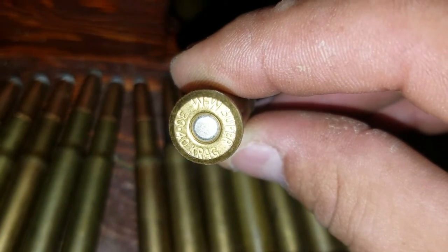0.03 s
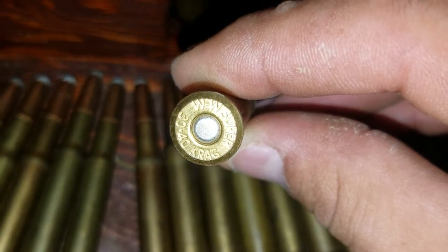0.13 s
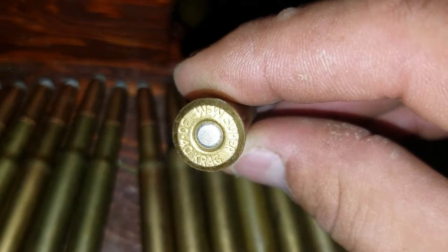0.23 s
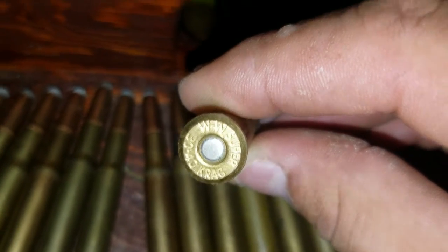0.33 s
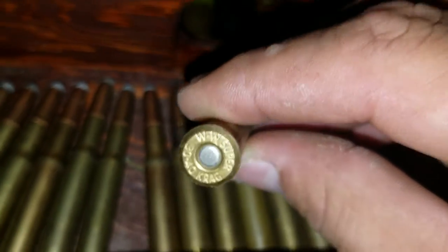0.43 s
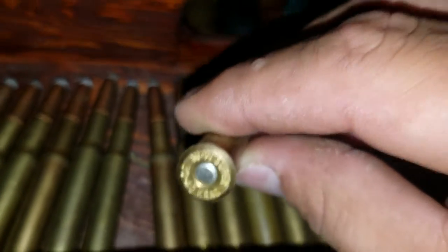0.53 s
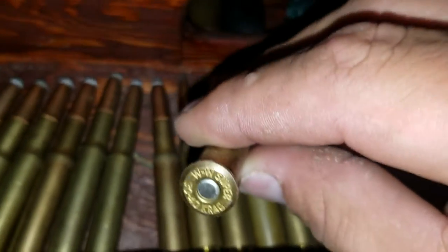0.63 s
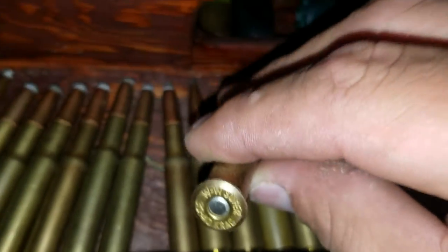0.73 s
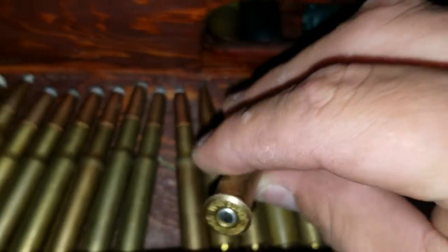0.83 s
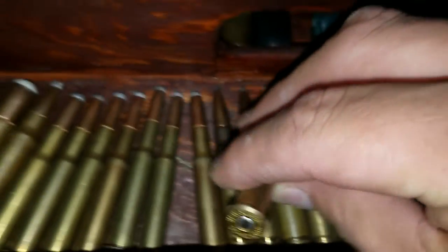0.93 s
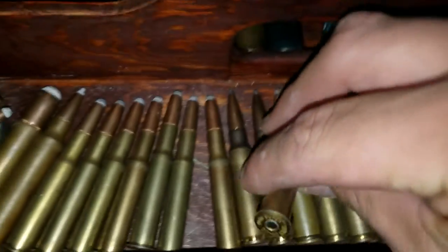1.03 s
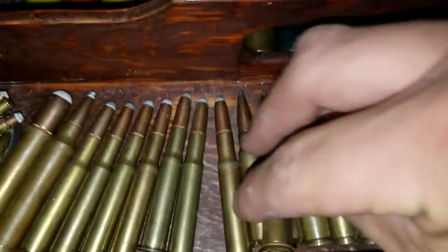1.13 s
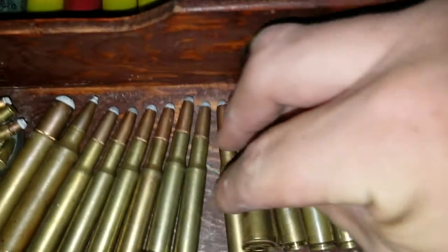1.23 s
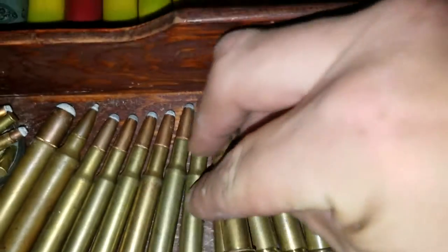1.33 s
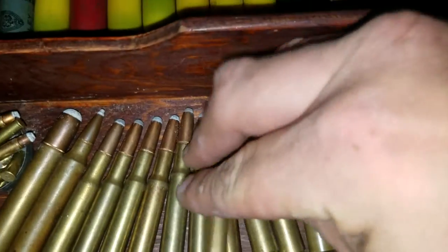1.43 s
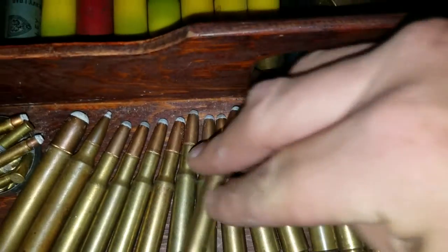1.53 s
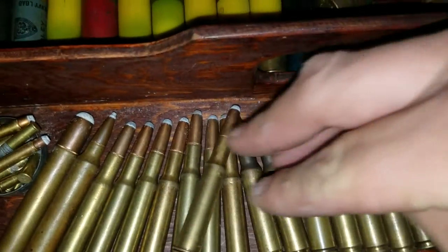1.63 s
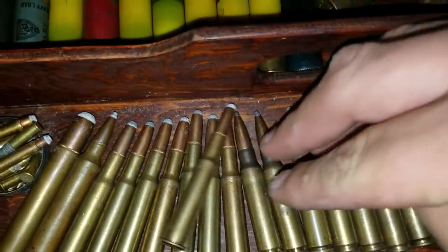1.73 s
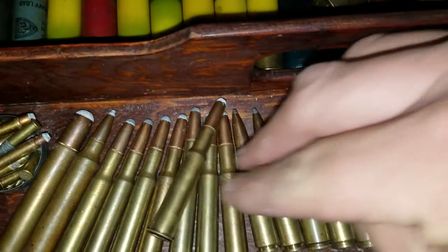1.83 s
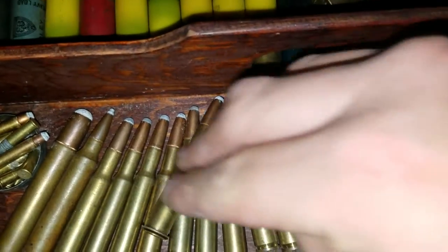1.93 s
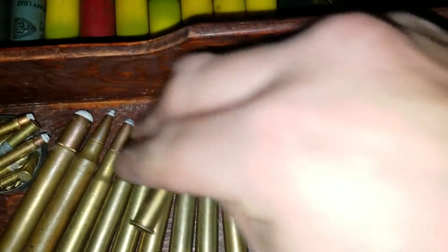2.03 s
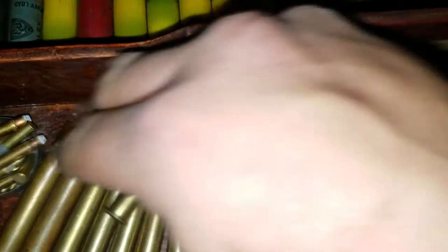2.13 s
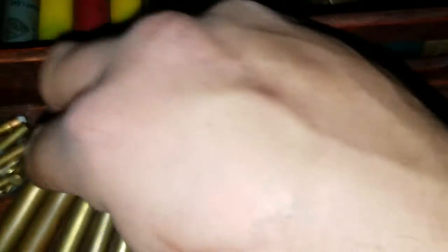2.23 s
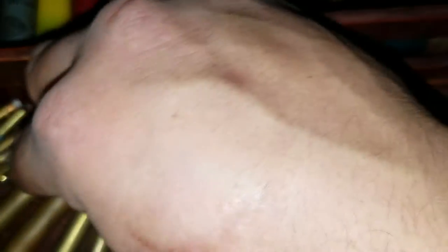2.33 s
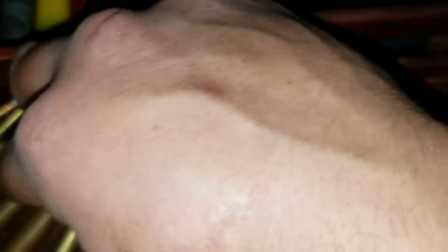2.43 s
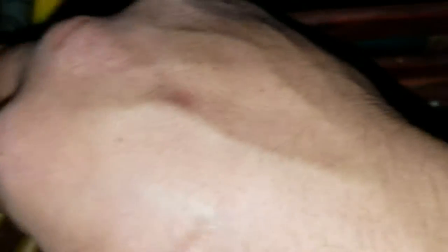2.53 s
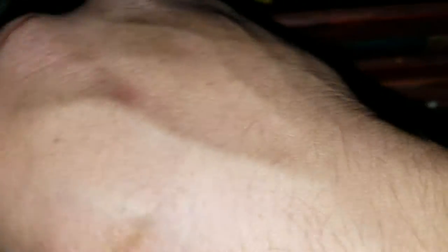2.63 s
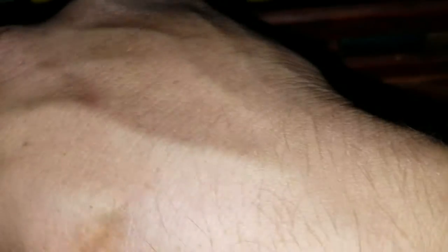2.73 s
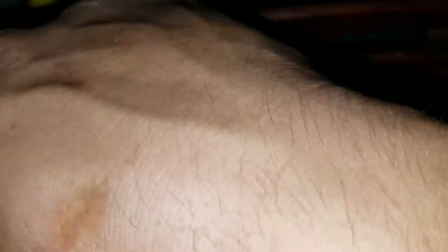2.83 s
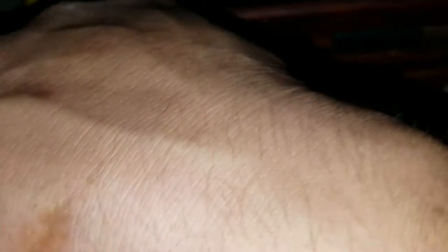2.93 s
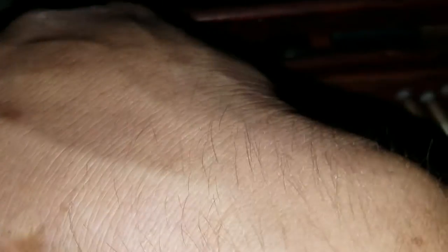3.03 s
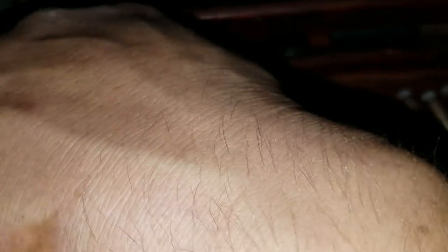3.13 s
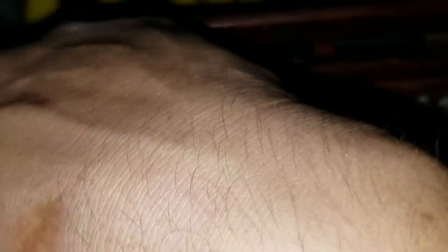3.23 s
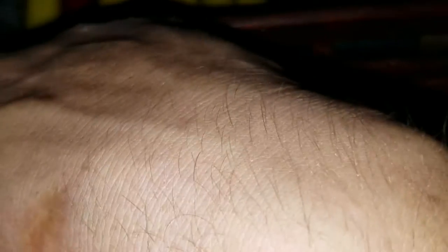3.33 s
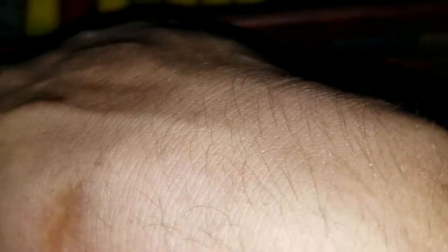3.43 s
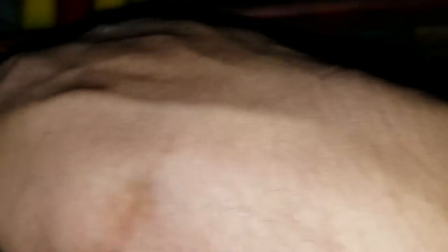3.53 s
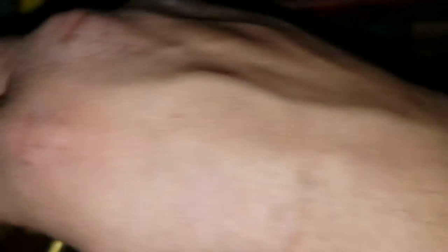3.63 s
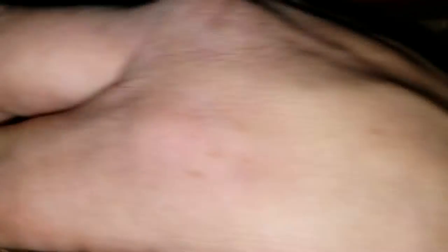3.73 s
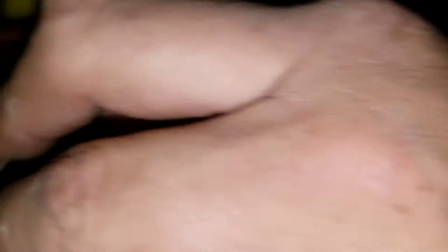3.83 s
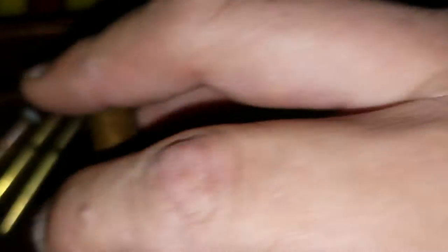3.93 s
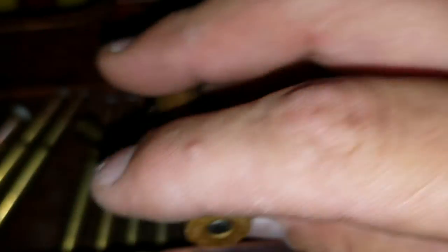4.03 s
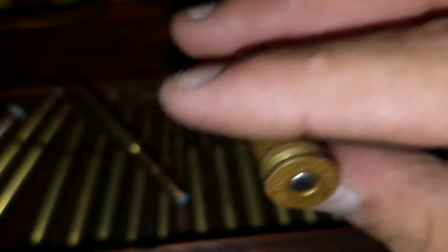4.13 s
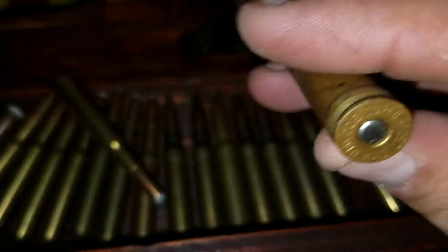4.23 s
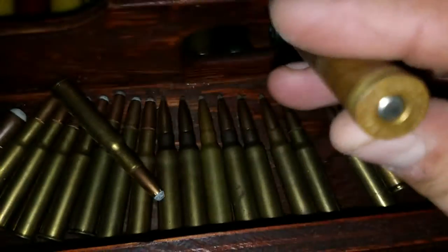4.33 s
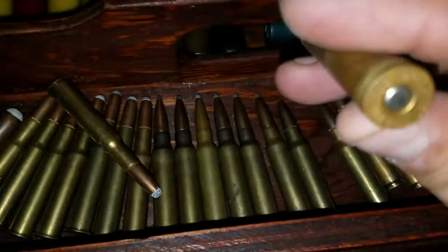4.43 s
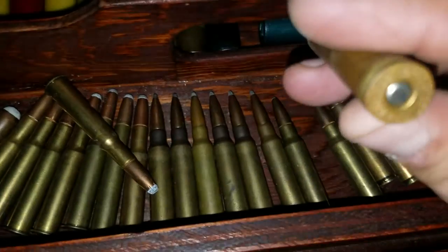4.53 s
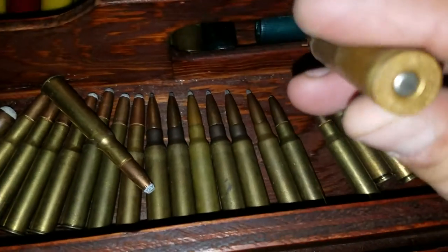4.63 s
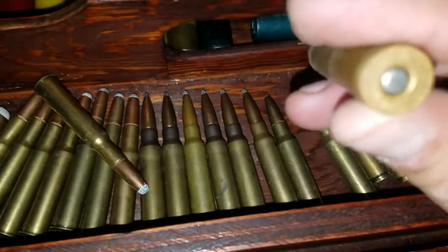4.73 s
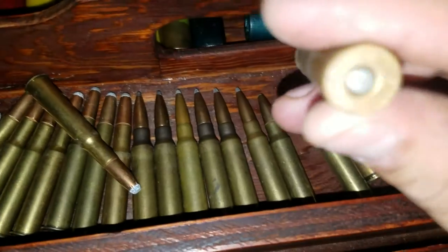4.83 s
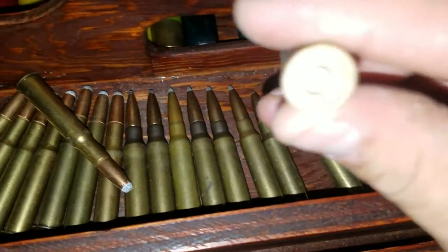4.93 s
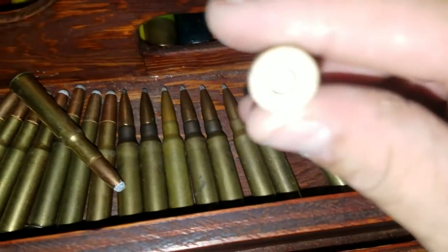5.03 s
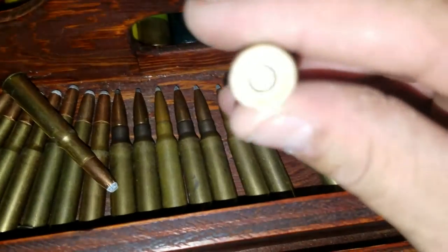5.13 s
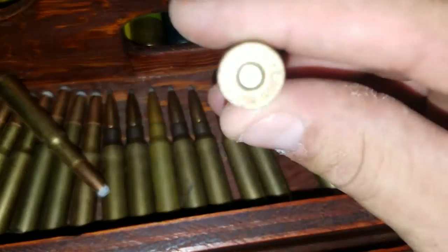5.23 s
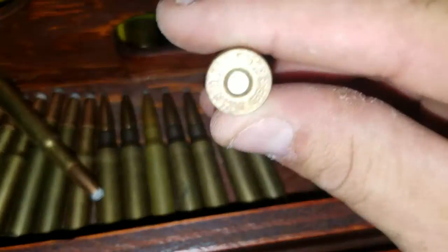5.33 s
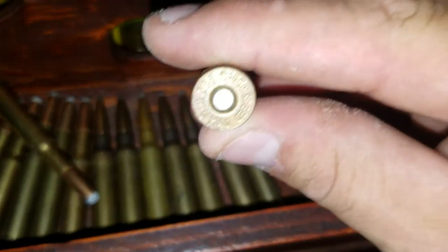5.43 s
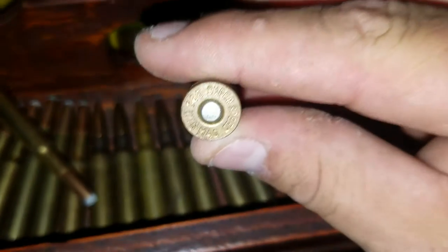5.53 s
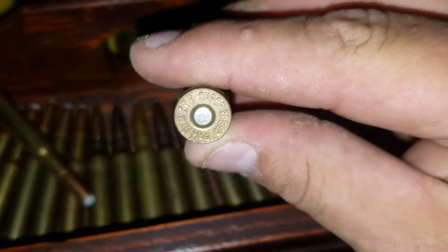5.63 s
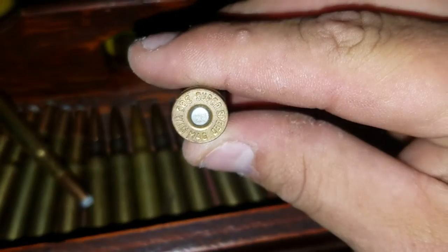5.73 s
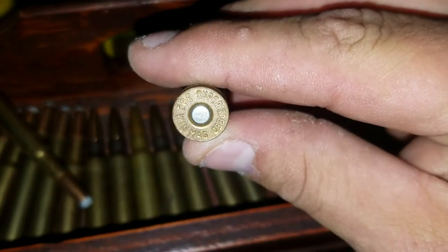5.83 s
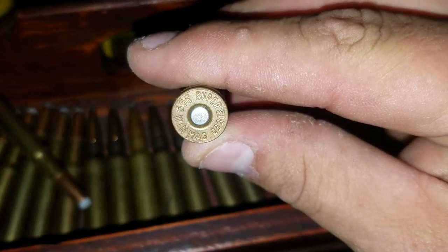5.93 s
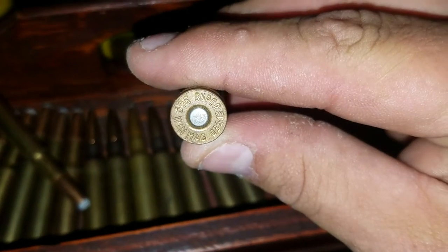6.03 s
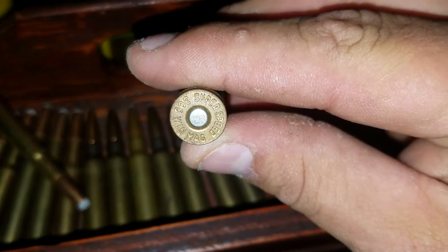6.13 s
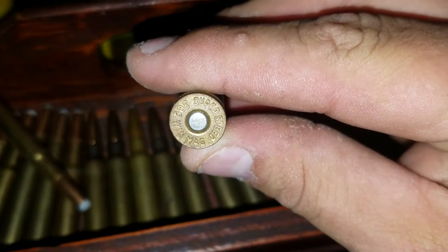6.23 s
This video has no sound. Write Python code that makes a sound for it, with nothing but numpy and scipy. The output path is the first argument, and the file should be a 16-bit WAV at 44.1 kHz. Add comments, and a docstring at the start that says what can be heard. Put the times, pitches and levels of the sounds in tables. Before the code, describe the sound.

Brass rifle cartridges clink, knock and scrape in a wooden drawer as a hand rummages through them, close up in a small room.

```python
"""Over a faint steady hush, a hand brushes a row of brass rifle cartridges in a wooden drawer, close on the left.
First come dull bumps (short low swings), a soft clink and a thin rising squeak (one gliding tone).
From about 1 s the hand lays a cartridge among the others: knocks and clinks, made of dying tones and noise bursts.
From about 2 s it rummages along the row and picks up another; scrapes of filtered noise join the clinks.
The clinks and knocks go on until about 4.4 s; a soft knock with a bump comes near 5 s. A small room echoes."""
import sys
import numpy as np
from scipy import signal
from scipy.io import wavfile
from scipy.ndimage import uniform_filter1d, minimum_filter1d

SR = 44100
rng = np.random.default_rng(int(sys.argv[2]) if len(sys.argv) > 2 else 0)


def wav_out(sig):
    """Save sig, one row per channel (or a flat mono array), as 16-bit PCM at SR to the path in sys.argv[1]."""
    wavfile.write(sys.argv[1], SR, np.round(np.clip(np.atleast_2d(sig).T, -1, 1) * 32767).astype(np.int16))


N = 277036
TIME = np.arange(N) / SR
HIT_TIME = np.arange(SR // 4) / SR  # a blow lasts a quarter of a second at most
HALF_SECOND = np.arange(SR // 2) / SR

# One case strikes another. Each row: start in seconds, ring level in dB, ring pitch in Hz, high chime level in dB,
# clatter of the neighbours in dB, wood under them in dB, sharp tick in dB, length of the ring as a factor.
CLINKS = [(0.572, -36, 4220, -62, -54.5, -75, -72, 0.4), (1.1158, -14, 4106, -25, -34, -28, -24, 0.48),
          (1.2359, -40, 6140, -52.5, -48.5, -43, -54.5, 0.43),
          (1.3266, -22, 6380, -25.5, -27, -35, -32, 0.34),
          (1.3587, -26.5, 5100, -23.5, -34, -18, -25, 0.54),
          (1.388, -24, 4140, -16.5, -32.5, -27.5, -32, 1.1),
          (1.3937, -21.5, 4200, -33.5, -26.5, -23, -22, 1.0), (1.4545, -9, 4195, -12, -18, -35, -35, 1.0),
          (1.46, -20.5, 4050, -22, -32.5, -17, -44, 0.4), (1.4673, -15, 4350, -25, -23.5, -20, -32.5, 0.64),
          (1.4883, -21, 4130, -10.5, -27, -27, -15.5, 1.2),
          (1.4991, -18.5, 4190, -25.5, -36.5, -30.5, -54.5, 0.95),
          (1.7833, -35, 4700, -31.5, -40.5, -33, -49.5, 0.7),
          (1.853, -46, 6240, -72, -52.5, -54, -70.5, 0.4),
          (2.0613, -28, 4629, -37.5, -41, -33.5, -55.5, 0.4),
          (2.0842, -15.5, 4140, -3.5, -25, -24.5, -38.5, 1.5),
          (2.138, -57, 4100, -57, -59, -37.5, -66, 0.82), (2.153, -33.5, 4640, -49, -51, -44, -62, 0.48),
          (2.1812, -35.5, 4800, -60, -40, -37.5, -66, 0.36),
          (2.2284, -34, 4540, -61.5, -45, -35.5, -70, 0.4), (2.258, -32, 4100, -50, -33.5, -43, -59, 0.4),
          (2.2784, -43, 5840, -39, -43, -44.5, -56.5, 0.5), (2.2978, -29.5, 4410, -27, -25, -42, -30.5, 1),
          (2.3198, -33.5, 5740, -23, -40.5, -40.5, -37, 0.68),
          (2.3407, -25, 4840, -31, -37.5, -48.5, -30, 0.5),
          (2.4856, -47, 4820, -65, -47.5, -48.5, -63.5, 0.4),
          (2.5333, -19.5, 4620, -37.5, -27, -28, -36.5, 0.6),
          (2.5859, -37, 4670, -48, -45, -35, -63.5, 0.4),
          (2.6513, -14.5, 4520, -37.5, -24, -32, -36.5, 0.67),
          (2.7891, -30.5, 5760, -53.5, -33, -34, -47.5, 0.36),
          (2.9721, -13, 4478, -18.5, -18.5, -24.5, -26, 0.73),
          (2.9994, -13, 4460, -15.5, -25, -29.5, -26, 0.95), (3.1852, -26, 5880, -20, -29, -33.5, -39, 1.2),
          (3.1931, -13, 5460, -33, -29, -28.5, -28.5, 0.88),
          (3.2215, -9.5, 5320, -37, -28.5, -27.5, -36, 0.9), (3.23, -17, 6370, -46.5, -30, -36, -37, 0.8),
          (3.2382, -21.5, 5430, -42.5, -32, -26, -50, 0.5),
          (3.2481, -24, 5330, -44, -34.5, -31.5, -48, 0.4),
          (3.289, -33.5, 4500, -30.5, -37.5, -39, -39, 0.7),
          (3.713, -40, 4300, -26.5, -41, -49, -44.5, 0.7), (3.981, -48.5, 5480, -66, -60.5, -51, -68, 1.3),
          (3.3273, -16, 4300, -19, -19.5, -21, -14.5, 1.1), (3.34, -29.5, 5780, -30, -17, -35, -37.5, 1.1),
          (3.358, -28.5, 5375, -37, -38, -48.5, -33.5, 1.2), (3.379, -29.5, 5512, -40, -34, -45, -46, 0.6),
          (3.407, -34, 4650, -51.5, -28.5, -33, -48.5, 0.6),
          (3.4908, -35.5, 4250, -55, -41, -44, -57, 0.51),
          (3.5468, -32, 5150, -37.5, -38, -36.5, -43, 0.79),
          (3.563, -20.5, 4200, -29.5, -24.5, -32.5, -22.5, 0.9),
          (3.573, -19, 4360, -22, -25.5, -35.5, -20.5, 1.1), (3.58, -26, 4430, -36, -21, -36.5, -30, 0.5),
          (3.6517, -20.5, 4680, -15, -20.5, -18, -43.5, 0.6),
          (3.7237, -22, 4220, -37, -38, -35, -50.5, 1.4), (3.7479, -29.5, 4110, -48, -46, -30, -45, 1.4),
          (3.809, -35.5, 4188, -44.5, -42.5, -41, -64, 0.9),
          (3.8592, -31.5, 6060, -40, -36, -50, -49, 0.45), (3.8697, -44, 3980, -22, -27, -38.5, -37, 2.5),
          (3.8797, -30.5, 4050, -40, -30.5, -44, -44, 1.5), (3.8914, -27, 4080, -16, -47, -56, -30, 1.4),
          (4.088, -47.5, 6260, -61, -49, -50, -53, 0.4), (4.1317, -39, 4328, -60, -53, -43.5, -63, 1.2),
          (4.1706, -27.5, 4470, -28.5, -23.5, -32, -46, 0.77),
          (4.1846, -27, 5700, -23, -33, -27.5, -31, 1.1), (4.212, -24, 4260, -32, -39, -31.5, -48, 0.9),
          (4.2287, -23.5, 4140, -21.5, -41, -56, -29, 1.6), (4.2484, -32, 4200, -24, -40, -33, -37, 0.65),
          (4.2604, -37, 4100, -33, -37, -43, -50, 0.7), (4.307, -39, 4080, -46, -38, -40, -56, 1.0),
          (4.313, -42, 4112, -51, -46, -38.5, -48, 0.8), (4.3501, -23, 5480, -50, -27, -52, -30, 0.45),
          (4.3588, -19.5, 5280, -37, -25, -41.5, -44, 0.4), (4.3723, -33, 5178, -62, -48, -42, -59, 0.47)]
# A cartridge drops against the wood. Each row: start in seconds, wood level in dB, centre of the knock in Hz,
# clatter of the brass in dB.
KNOCKS = [(0.41, -47.5, 1300, -55.5), (0.9554, -40.5, 1900, -41), (1.068, -28.5, 2270, -38.5),
          (1.2963, -31, 1185, -33), (1.361, -22, 1557, -24), (1.3816, -17.5, 1464, -33.5),
          (1.0864, -53, 1800, -47.5), (1.273, -47.5, 2300, -41.5), (1.278, -39, 2300, -48.5),
          (1.551, -27, 1630, -40), (1.622, -16, 1256, -31.5), (1.653, -31.5, 1339, -34),
          (1.694, -22, 1393, -37.5), (1.7193, -25, 1228, -42), (1.7734, -17, 1600, -28),
          (2.03, -50, 1400, -74.5), (2.1593, -33, 1050, -38), (2.2157, -36, 1036, -34.5),
          (2.2728, -32.5, 1180, -37), (2.2905, -27.5, 1090, -37.5), (2.0415, -69, 2500, -59),
          (1.763, -43, 1500, -46), (2.333, -18.5, 1816, -25), (2.3518, -18, 1400, -31),
          (2.374, -26.5, 1144, -37.5), (2.5756, -33.5, 1512, -42), (2.701, -26.5, 1110, -33),
          (2.7545, -15, 1670, -39), (2.8048, -19.5, 1204, -30.5), (2.8612, -16.5, 1580, -32),
          (2.766, -25.5, 2000, -42), (2.8931, -37.5, 1283, -42), (3.0418, -37, 1137, -52),
          (3.513, -42.5, 1200, -57.5), (3.5958, -34.5, 1100, -38.5), (3.538, -39, 1098, -38.5),
          (3.2187, -21, 1044, -40.5), (3.173, -24.5, 1670, -36), (3.2776, -10.5, 1150, -26),
          (3.2959, -24, 1074, -43), (3.3032, -31, 1170, -32.5), (3.668, -7.5, 1228, -19),
          (3.673, -26, 1900, -23.5), (3.685, -30, 1070, -34), (3.712, -19, 1200, -32.5),
          (3.821, -29, 1540, -47), (4.1609, -26.5, 1370, -35), (4.191, -14.5, 1600, -28),
          (4.1995, -19, 1267, -24), (4.351, -28.5, 2320, -40), (4.399, -48.5, 859, -61),
          (5.067, -57.5, 1900, -60.5), (5.074, -51, 480, -68)]
# Lower tones of a case. Each row: ratio to the ring pitch, level in dB, time to fade by 60 dB in seconds
# (times the length factor).
RING = [(1, 8.5, 0.04), (1.2, -1.5, 0.021), (1.068, 2, 0.026), (.955, 1, .02), (1, -4, 0.019),
        (0.94, -8.5, 0.02), (1.2, -8.5, .022), (1.32, -11, 0.021)]
# Upper tones of a case. Each row: pitch in Hz before it is varied, level in dB, time to fade by 60 dB in seconds
# (times the length factor).
CHIME = [(10696, 0.5, 0.02), (10690, -10.5, 0.058), (10690, -7, 0.031), (10394, -2, 0.015),
         (12500, -26, .02)]
# Tones of the wooden drawer. Each row: pitch in Hz before it is varied, level in dB,
# time to fade by 60 dB in seconds.
DRAWER = [(585, -11.5, 0.04), (660, -4.5, 0.06), (717, -5.5, 0.028), (807, -1, 0.02), (925, 5, 0.018),
          (1050, 5, 0.0088), (1170, 0, 0.016), (1374, -3, 0.016), (1515, -7, 0.029), (1683, -4.5, 0.012),
          (1944, 3, 0.022), (2120, -4.5, .014), (2266, 0, 0.039), (2590, 1, 0.017), (2540, -3.5, 0.024),
          (2950, -6, 0.012), (3350, 2, 0.02)]
# Low tones of the cabinet. Each row: pitch in Hz before it is varied, level in dB,
# time to fade by 60 dB in seconds.
CABINET = [(78.2, -5.5, 0.12), (104, 3, 0.06), (135, 2, 0.06), (165, -2.5, 0.037), (203.5, -2, 0.07),
           (250.7, 0, 0.074), (296.5, 0, 0.11), (340, 1.5, 0.046), (393.5, -2.5, 0.037)]
# Tone colour of clattering brass. Each row: frequency in Hz, level in dB.
CLATTER_COLOUR = [(300, -19.5), (2000, -16), (3200, -5), (4100, 3), (5000, 3), (6200, 3), (7300, -15),
                  (10000, -27), (16000, -35.5)]
# Tone colour of the sharp tick. Each row: frequency in Hz, level in dB.
TICK_COLOUR = [(200, -0.5), (1500, -8), (5000, -8), (7500, 1), (9000, 3.5), (10700, 10), (12500, -2.5),
               (15000, -10), (17000, -12.5)]
# Knocks on a board's ringing spot. Each row: start in seconds, level in dB before a lift of 6, pitch in Hz.
BOARD_RINGS = [(2.3527, -15.5, 1063), (2.374, -26.5, 1047), (2.703, -29, 1061), (2.8622, -12.5, 1054),
               (3.2965, -18, 1063), (4.4, -43.5, 890)]
# Extra high and low tones of some clinks, from short pings to long rings. Each row: start in seconds,
# pitch in Hz, level in dB before a lift of 3.5, time to fade by 60 dB in seconds.
EXTRA_RINGS = [(1.489, 10550, -37, 0.3), (1.489, 4130, -47, 0.16), (1.116, 4060, -40, 0.15),
               (2.085, 10640, -49, 0.14), (3.0, 10700, -40, 0.35), (3.0, 4435, -51, 0.55),
               (3.193, 12680, -21, 0.036), (3.222, 12200, -29.5, 0.1), (3.222, 5310, -24.5, 0.12),
               (3.328, 8940, -40, 0.35), (3.327, 10880, -29.5, 0.29), (3.328, 8700, -25.5, 0.047),
               (3.564, 8620, -20, 0.061), (3.565, 8600, -36, 0.19), (3.89, 4097, -41, 0.23),
               (3.892, 10580, -53, 0.5)]
# Near-alike tones in the row of cartridges. Each row: centre in Hz, spread in Hz, level in dB,
# time to fade by 60 dB in seconds.
ROW = [(1034, 33, -29, .3), (2620, 81, -29, 0.13), (4200, 130, -29.5, .22), (4560, 180, -26.5, .22),
       (5900, 560, -28, .22), (10300, 170, -27.5, .27)]
# Brass sliding on brass and wood. Each row: start in seconds, end in seconds, level at the end in dB,
# swell towards the end in dB (a negative one fades).
SLIDES = [(1.369, 1.41, -30, 2), (2.283, 2.338, -29, 10), (2.522, 2.534, -40.5, 7.5),
          (2.935, 2.969, -20.5, 17), (2.962, 3.011, -26, -2.5), (3.147, 3.188, -21, 19),
          (3.184, 3.254, -32.5, -12.5), (3.299, 3.335, -29.5, -1), (3.529, 3.566, -34.5, 13),
          (3.681, 3.78, -44, -9.5), (4.186, 4.25, -32, 17.5)]
# Tone colour of the slides. Each row: frequency in Hz, level in dB.
SLIDE_COLOUR = [(80, -25), (500, -4), (1000, 2.5), (2200, -2), (3200, -6), (4400, -1), (6000, 1),
                (7500, -22.5), (9500, -13.5), (10700, -16.5), (12000, -16), (16000, -26)]
# How firmly the fingers rub over the cartridges. Each row: time in seconds, level in dB before it wavers.
RUB = [(0, -89), (.35, -67), (.88, -62.5), (.99, -52.5), (1.3, -47), (1.78, -60.5), (1.94, -92),
       (2.17, -51), (2.42, -56), (2.62, -50), (2.77, -45), (2.92, -59.5), (3.03, -41), (3.13, -53.5),
       (3.33, -50), (3.98, -56), (4.08, -52.5), (4.33, -45.5), (4.5, -63.5), (4.62, -69), (4.72, -80)]
# Tone colour of the rubbing. Each row: frequency in Hz, level in dB.
RUB_COLOUR = [(40, -14.5), (250, 4), (500, -2.5), (1000, 1), (1900, -1.5), (2300, -2.5), (2600, 2),
              (3100, -4.5), (4100, -2), (4800, 2.5), (5300, -1.5), (6000, 2), (7500, -17), (10500, -5.5),
              (12500, -19.5), (16000, -23)]
# Soft bumps of the hand on the drawer. Each row: start in seconds, level in dB before a lift of 5.5, pitch in Hz.
BUMPS = [(0.133, -52, 110), (0.322, -50, 94), (0.672, -51, 98), (0.757, -46, 68), (.822, -56.5, 140),
         (.908, -52.5, 65), (1.02, -49, 75), (1.068, -39.5, 230), (1.165, -53, 80), (1.459, -40.5, 150.7),
         (1.485, -28.5, 240), (1.622, -41, 150), (1.694, -44, 130), (2.083, -38, 130.8), (2.24, -30.5, 326),
         (2.246, -31.5, 260.6), (2.589, -41.5, 110.2), (2.872, -35, 210), (3.198, -32.5, 340),
         (3.327, -30, 171.1), (3.565, -31, 142.1), (5.064, -33, 265), (5.072, -40, 97)]
# A faint rising squeak. Each row: time in seconds, pitch in Hz and level in dB, both before they waver.
SQUEAK = [(0.66, 290, -64), (0.74, 324, -59), (.825, 348, -51.5), (.86, 360, -63)]
# Colour on the side facing away. Each row: frequency in Hz, level in dB.
SHADOW = [(80, 0.5), (200, 4.5), (550, 2.5), (1100, 0), (2200, -5.5), (5000, -3), (10000, -5.5)]
# How long the room echoes. Each row: frequency in Hz, time to fade by 60 dB in seconds.
ROOM_T60 = [(150, 1), (500, 0.36), (1400, 0.47), (3000, 0.32), (5500, 0.5), (10000, 0.12), (16000, 0.46)]
# Tone colour of the room's tail. Each row: frequency in Hz, level in dB.
ROOM_COLOUR = [(100, -2), (1000, 3), (3000, -2.5), (5800, -9.5), (7500, -16), (11000, -12.5), (16000, -9.5)]
# Tone colour of the still room and microphone hiss. Each row: frequency in Hz, level in dB.
HUSH = [(15, -35.5), (27, -0.5), (92, -7), (123, -1.5), (153, -6), (317, -10), (394, -15), (427, -15.5),
        (659, -17.5), (911, -17), (2610, -26.5), (4610, -30), (8360, -38.5), (16000, -27.5)]

CASE_LOW_HZ, CASE_HIGH_HZ = 4480, 6120  # range in which the cases ring in a knock, from long to short
CLINK_WOOD_HZ = 1280  # centre of the wood's answer to a clink
THUMP_DB, THUMP_HZ = -31, 227  # the cabinet under each contact: level against the wood, centre
RING_OF_CLATTER_DB, CHIME_OF_CLATTER_DB, TICK_OF_CLATTER_DB = -1.5, -13, -11.5  # in a knock, against its clatter
CHATTER_S = 0.0018  # a contact keeps buzzing this long before its tones are left to die
RING_SPREAD, RING_PARTNERS_DB = 0.013, -6  # near-alike cases ring along: pitch spread as a share, level of each
RUB_INTO_ROW_DB = 3.5  # rubbing drives the row this much harder than a blow does
JOSTLE_DB, JOSTLES_PER_S = -10.5, 140  # ticks of shifting cases: level against the rubbing hiss, rate
BUMP_CYCLES = 0.98  # a bump falls to about a third within this many cycles
SHUDDER_DB, SHUDDER_S = -19, 0.045  # the cabinet after a bump: level, time to fall to about a third
SHADOW_DELAY_S = 0.00009
HUSH_DB = -64
LOW_CUT_HZ, EDGE_HZ, CEILING_DB = 64, 16350, -0.8  # bass cut, upper band limit, limiter ceiling


def amp(db):
    """Turns decibels into a gain."""
    return 10 ** (np.asarray(db) / 20)


def unit(x):
    """Scales a sound to an average strength (rms) of 1."""
    return x / np.sqrt(np.mean(x ** 2) + 1e-20)


def unit_attack(x):
    """Scales each channel to rms 1 over its first 6 ms."""
    attack = x[:, :265]
    return x / np.sqrt(np.mean(attack ** 2, axis=1, keepdims=True) + 1e-20)


def sixty_db_fade(t, t60):
    """Fades like a freely dying tone, by 60 dB in t60 seconds."""
    return np.exp(-np.log(1000) * t / t60)


def read(points, hz):
    """Reads a table of (Hz, value) between its points, on a log-frequency axis."""
    f, value = np.transpose(points)
    return np.interp(np.log(hz + 1), np.log(f + 1), value)


def colour(x, points):
    """Filters a sound to a spectrum of (Hz, dB), without any sound ahead of its cause."""
    hz = abs(np.fft.fftfreq(4096, 1 / SR))
    log_gain = np.log(amp(read(points, hz)))
    minimum_phase = np.exp(np.conj(signal.hilbert(log_gain)))
    taps = np.fft.ifft(minimum_phase).real[:2048]
    return signal.oaconvolve(x, taps[None], axes=1)[:, :x.shape[1]]


def noise(size, likeness=0):
    """Makes white noise for two channels, partly shared."""
    a, b = rng.standard_normal((2, size))
    same = np.clip(likeness, 0, 1)
    return np.array([a, same * a + np.sqrt(1 - same ** 2) * b])


def waver(size):
    """Makes a slow random wobble of rms 1, smoothed over size samples."""
    return unit(uniform_filter1d(rng.standard_normal(N), size=size))


def sides(right_db):
    """Gives the gains of the left and right channel."""
    return amp([[0], [right_db]])


def add(mix, s, sound):
    """Mixes a sound in at time s, in seconds."""
    part = mix[:, max(round(s * SR), 0):][:, :sound.shape[1]]
    part += sound[:, :part.shape[1]]


def contacts():
    """Every contact rings wood and brass and rattles the neighbours: returns the tones and the rattle."""
    tones, rattle = np.zeros((2, 2, N))
    wood_sides, brass_sides = sides(right_db=-4.5), sides(right_db=-11.0)
    for s, wood_db, wood_hz, clatter_db, ring_db, ring_hz, chime_db, tick_db, length in blows():
        wood = amp(wood_db) * wood_sides
        wood_tones = knock(DRAWER, wood_hz * 1.023, octaves=0.95, uneven_db=2.5)
        add(tones, s, amp(-1.36) * wood * wood_tones)
        ring = brass(RING, ring_hz, min(length, 1.3))
        add(tones, s, amp(ring_db) * brass_sides * ring)
        chime_tuning = 1 + 0.003 * rng.standard_normal()
        chime = brass(CHIME, chime_tuning, length)
        add(tones, s, amp(chime_db) * brass_sides * chime)

        clack = burst(clack_colour(wood_hz), fall_s=0.0077, likeness=0.29)
        add(rattle, s, amp(-4.5) * wood * clack)
        clatter = burst(CLATTER_COLOUR, fall_s=0.0036, likeness=0.46)
        add(rattle, s, amp(clatter_db) * brass_sides * clatter)
        tick = burst(TICK_COLOUR, fall_s=0.002, likeness=0.4)
        add(rattle, s, amp(tick_db) * brass_sides * tick)
        thump = knock(CABINET, THUMP_HZ, octaves=0.59, uneven_db=2.5)
        add(rattle, s, amp(THUMP_DB) * wood * thump)
    return tones, rattle


def blows():
    """Lists clinks and knocks alike, in the order that contacts() unpacks; a knock's brass follows its clatter."""
    rows = []
    for s, ring_db, ring_hz, chime_db, clatter_db, wood_db, tick_db, length in CLINKS:
        rows.append((s, wood_db, CLINK_WOOD_HZ, clatter_db, ring_db, ring_hz, chime_db, tick_db, length))
    for s, wood_db, wood_hz, clatter_db in KNOCKS:
        ring_hz = rng.uniform(CASE_LOW_HZ, CASE_HIGH_HZ)
        ring_db = clatter_db + RING_OF_CLATTER_DB
        chime_db = clatter_db + CHIME_OF_CLATTER_DB
        tick_db = clatter_db + TICK_OF_CLATTER_DB
        rows.append((s, wood_db, wood_hz, clatter_db, ring_db, ring_hz, chime_db, tick_db, 0.6))
    return rows


def brass(modes, tuning, length):
    """A case rings until its neighbours damp it; its side tones differ from blow to blow."""
    pitch, db, t60 = np.transpose(modes)
    pitch = pitch + 0.18 * (pitch - pitch[0]) * rng.standard_normal(len(pitch))
    return struck(tuning * pitch, db, t60 * length, rise_s=0.00045, spread=7.7, uneven_db=-0.5)


def knock(modes, centre_hz, octaves, uneven_db):
    """Wood answers most around a pitch set by the hardness of the blow."""
    hz, db, t60 = np.transpose(modes)
    hz = hz * (1 + 0.0349 * rng.standard_normal(len(hz)))
    bell_db = -4.3 * (np.log2(hz / centre_hz) / octaves) ** 2
    return struck(hz, db + bell_db, t60, rise_s=1 / centre_hz, spread=0.61, uneven_db=uneven_db)


def struck(hz, db, t60, rise_s, spread, uneven_db):
    """Dying tones: the place of the blow changes their shares, and each reaches the two sides in its own phase."""
    strength, skew = rng.standard_normal((2, len(hz), 1))
    phase = 2 * np.pi * rng.random((len(hz), 1))
    t = HIT_TIME[HIT_TIME < 2 * t60.max()]
    fade_db = -60 * np.maximum(t - CHATTER_S, 0) / t60[:, None]
    level = amp(db[:, None] + uneven_db * strength + fade_db)
    modes = level * np.exp(2j * np.pi * hz[:, None] * t + 1j * phase)
    left = modes.sum(0).real
    right = (modes * np.exp(1j * spread * skew)).sum(0).real
    return unit_attack(np.array([left, right]) * (1 - np.exp(-t / rise_s)))


def clack_colour(hz):
    """The noisy part of a wood knock is strongest around its pitch: returns (Hz, dB) points."""
    return [(hz / 30, -46), (hz / 8, -19), (hz / 3, -15), (hz / 1.58, 0),
            (hz * 1.18, -1), (hz * 2.29, -9), (hz * 6, -34)]


def burst(points, fall_s, likeness):
    """A click scattered among the packed cartridges: coloured noise that starts fast and dies away."""
    t = HIT_TIME[:SR // 12]
    envelope = np.exp(-t / fall_s) * (1 - np.exp(-t / 0.00016))
    return unit_attack(colour(noise(len(t), likeness) * envelope, points))


def board_rings():
    """A board of the drawer answers some knocks with one short hollow note."""
    out = np.zeros((2, N))
    envelope = (1 - np.exp(-HIT_TIME / 0.001)) * sixty_db_fade(HIT_TIME, t60=0.042)
    for s, db, hz in BOARD_RINGS:
        note = envelope * np.sin(2 * np.pi * hz * HIT_TIME)
        add(out, s, amp(db + 6.0) * sides(-4.0) * note)
    return out


def extra_rings():
    """Some clinks get extra dying tones, and near-alike neighbours join in, so they beat and shimmer."""
    out = np.zeros((2, N))
    t = HALF_SECOND
    for s, hz, db, t60 in EXTRA_RINGS:
        partners_hz = hz * (1 + RING_SPREAD * rng.standard_normal(size=4))
        own = np.sin(2 * np.pi * (hz * t + rng.random((2, 1))))
        partners = sum(np.sin(2 * np.pi * (f * t + rng.random((2, 1)))) for f in partners_hz)
        tone = own + amp(RING_PARTNERS_DB) * partners
        add(out, s, amp(db + 3.5) * sides(-2) * tone * sixty_db_fade(t, t60))
    return out


def row(x, count=16):
    """The cartridges lying side by side take up each shake and ring on faintly."""
    t = HALF_SECOND
    answer = np.zeros((2, len(t)))
    for hz, spread_hz, db, t60 in ROW:
        modes_hz = hz + spread_hz * rng.standard_normal((count, 1))
        modes = np.sin(2 * np.pi * (modes_hz * t + rng.random((2, count, 1))))
        group = modes.sum(1) * sixty_db_fade(t, t60)
        answer += amp(db) * group / np.linalg.norm(group[0])
    return sides(-8.5) * signal.fftconvolve(x[:1], answer, axes=1)[:, :N]


def slides():
    """Cases scrape along each other, mostly swelling until they slip off."""
    level = np.zeros(N)
    for start, end, db, swell_db in SLIDES:
        along = (TIME - start) / (end - start)
        swell = amp(np.interp(along, [0, 1], [db - swell_db, db]))
        soft_ends = np.clip(np.minimum(TIME - start, end - TIME) / 0.0079, 0, 1)
        level += swell * soft_ends
    scrape = unit(colour(grain(per_s=2600, size_db=2.8, smooth=0.5), SLIDE_COLOUR))
    return level * sides(-4.5) * scrape


def grain(per_s, size_db, smooth):
    """Friction: tiny slips of uneven size over a smooth hiss."""
    size = amp(size_db * np.minimum(rng.exponential(1, N), 4))
    slips = (rng.random(N) < per_s / SR) * size
    return unit(slips * noise(N, 0.5)) + smooth * noise(N, 0.31)


def rub():
    """Skin brushes the cartridges as the hand moves, with wavering pressure, and jostles them into tiny ticks."""
    s, db = np.transpose(RUB)
    pressure_db = 1.6 * waver(size=700)
    level = amp(np.interp(TIME, s, db) + pressure_db)
    hiss = unit(colour(grain(per_s=3700, size_db=0.5, smooth=0.57), RUB_COLOUR))
    ticks = unit(colour(grain(per_s=JOSTLES_PER_S, size_db=3.0, smooth=0), CLATTER_COLOUR))
    return level * sides(-9.0) * (hiss + amp(JOSTLE_DB) * ticks)


def bumps():
    """Dull pushes that die within a few cycles and leave the cabinet shuddering."""
    out = np.zeros((2, N))
    for s, db, hz in BUMPS:
        cycles = hz * HIT_TIME
        push = np.sin(2 * np.pi * cycles) * np.exp(-cycles / BUMP_CYCLES)
        rumble_colour = [(hz / 3, -8), (hz, 0), (hz * 2.2, -17), (hz * 8, -56)]
        rumble = unit(colour(noise(len(HIT_TIME), likeness=0.57), rumble_colour))
        shudder = amp(SHUDDER_DB) * rumble * np.exp(-HIT_TIME / SHUDDER_S)
        soft_start = 1 - np.exp(-cycles / 0.36)
        add(out, s, amp(db + 5.5) * sides(-6.0) * soft_start * (push + shudder))
    return out


def squeak():
    """One thin, unsteady gliding tone."""
    s, hz, db = np.transpose(SQUEAK)
    sounding = (TIME > s[0]) * (TIME < s[-1])
    level = amp(np.interp(TIME, s, db) + 2.8 * waver(size=600)) * sounding
    pitch = np.interp(TIME, s, hz) * (1 + 0.023 * waver(size=300))
    return sides(-6) * level * np.sin(2 * np.pi * np.cumsum(pitch) / SR)


def shadowed(x):
    """The right side hears the drawer later and a little duller."""
    right = colour(x[1:], SHADOW)[0]
    return np.array([x[0], np.interp(TIME - SHADOW_DELAY_S, TIME, right)])


def room(x, wet_db, early_db):
    """Quick echoes from the drawer's walls, then the room's diffuse tail, each pitch fading at its own rate."""
    hz, t, z = signal.stft(noise(SR), SR, nperseg=256)
    fade = sixty_db_fade(t, read(ROOM_T60, hz)[:, None])
    tail = signal.istft(z * fade, SR, nperseg=256)[1]
    t = np.arange(tail.shape[1]) / SR
    tail *= 1 - np.exp(-t / 0.012)
    tail = colour(tail / np.linalg.norm(tail[0]), ROOM_COLOUR)
    sparse = rng.random(len(t)) < 1500 / SR  # about 1500 echoes per second
    early = noise(len(t)) * sparse * (t > 0.003) * np.exp(-t / 0.036)
    early /= np.linalg.norm(early[0])
    echo = amp(wet_db) * sides(-0.36) * tail + amp(early_db) * sides(-7.5) * early
    return signal.fftconvolve(x[:1], echo, axes=1)[:, :N]


def hush():
    """The still room and microphone hiss: steady coloured noise."""
    return amp(HUSH_DB) * unit(colour(noise(N, 0.17), HUSH))


def scene():
    """The handling sounds in their room, over the hush; the rattle feeds the room a little more than the tones."""
    tones, rattle = contacts()
    tones = tones + board_rings()
    rattle = rattle + slides() + bumps()
    rubbing = rub()
    echoes = room(rattle + amp(-1.0) * tones, wet_db=-18.5, early_db=-25.0)
    neighbours = row(rattle + amp(RUB_INTO_ROW_DB) * rubbing)
    drawer = shadowed(tones + rattle + extra_rings() + neighbours)
    return drawer + echoes + rubbing + squeak() + hush()


def record(dry):
    """The microphone sheds the deepest bass, a fast limiter holds down the loudest peaks, then the top is cut."""
    bass_cut = signal.butter(2, LOW_CUT_HZ, "highpass", fs=SR, output="sos")
    dry = signal.sosfilt(bass_cut, dry)
    peak = -minimum_filter1d(-abs(dry).max(0), size=90)  # largest value nearby
    gain = uniform_filter1d(np.minimum(1, amp(CEILING_DB) / (peak + 1e-9)), size=60)
    band_limit = signal.firwin(255, EDGE_HZ, window=("kaiser", 7), fs=SR)
    return signal.oaconvolve(dry * gain, band_limit[None], "same")


dry = scene()
out = record(dry)
wav_out(out)
```